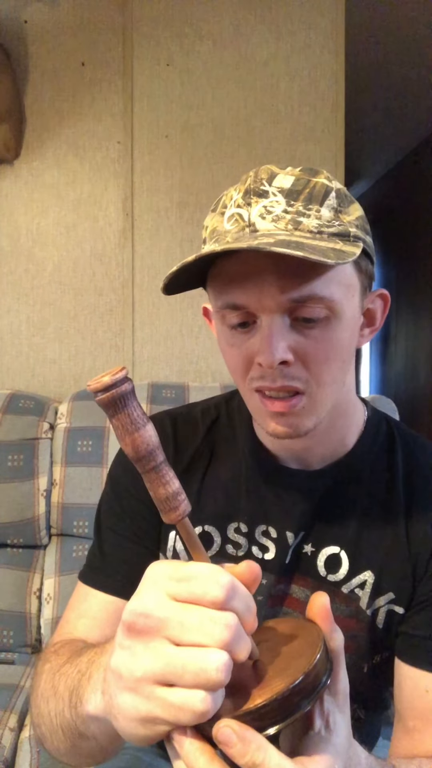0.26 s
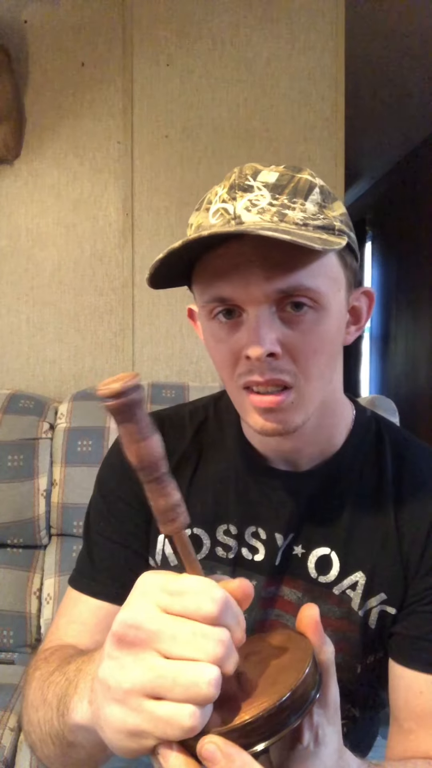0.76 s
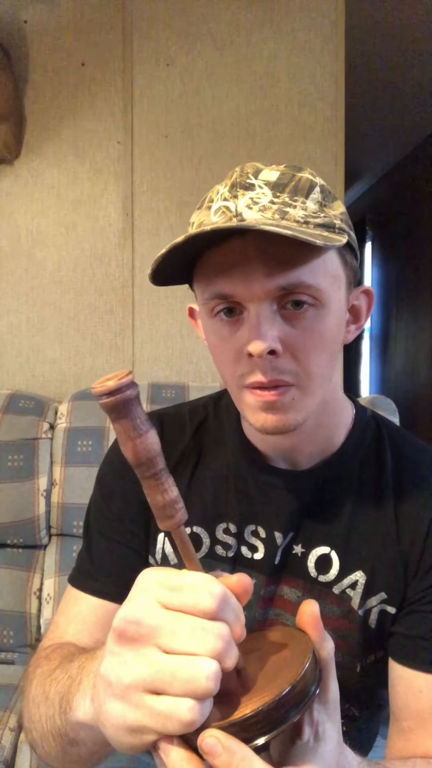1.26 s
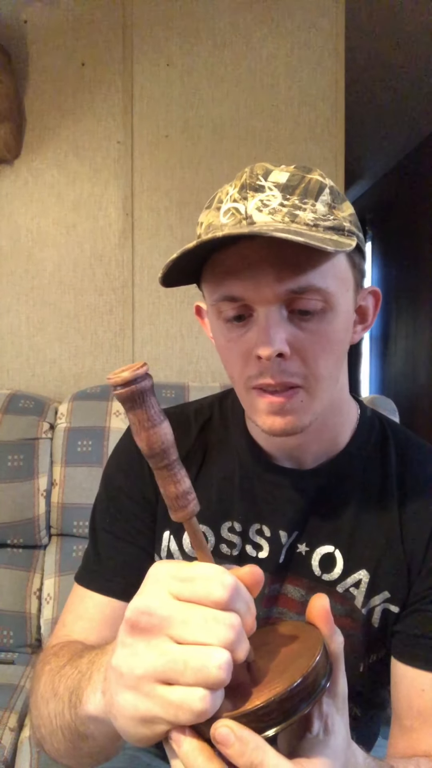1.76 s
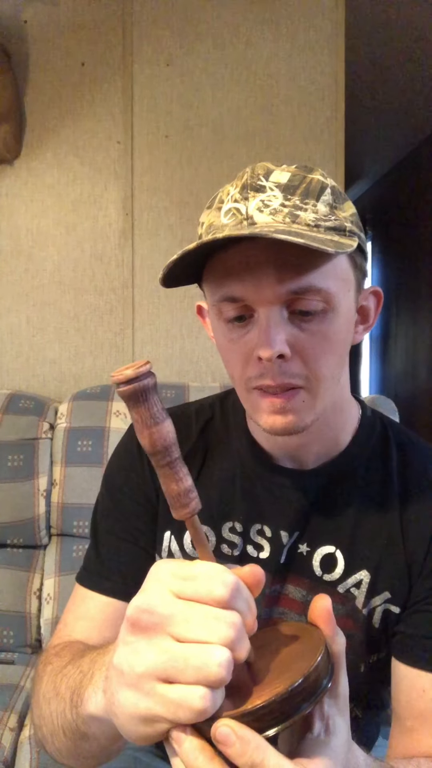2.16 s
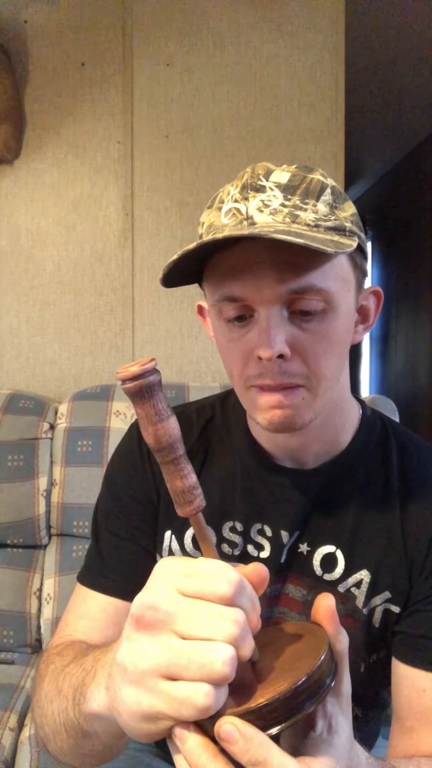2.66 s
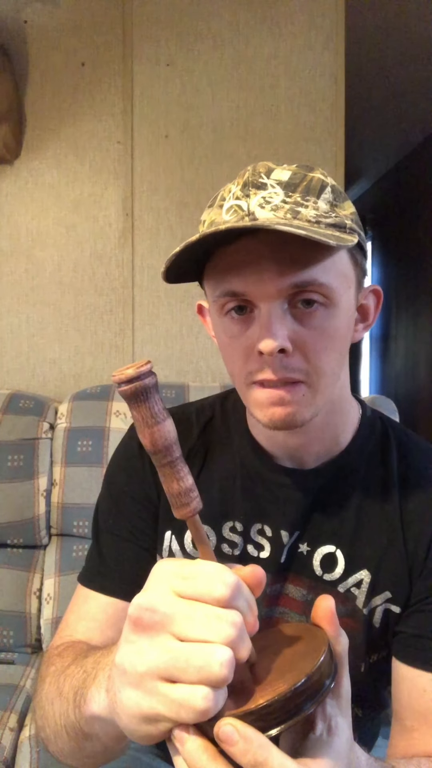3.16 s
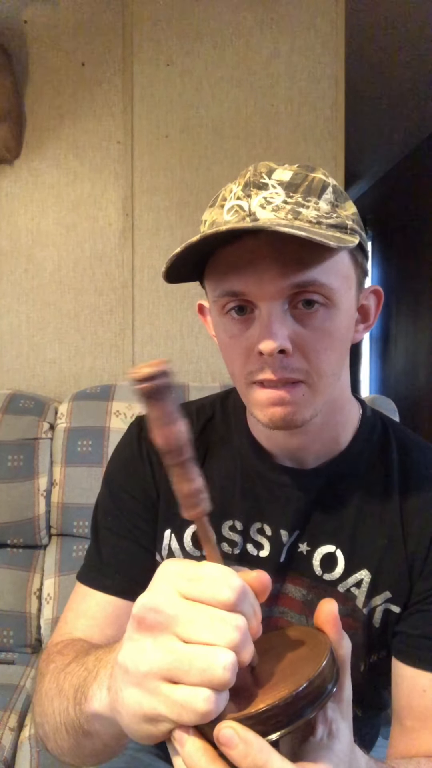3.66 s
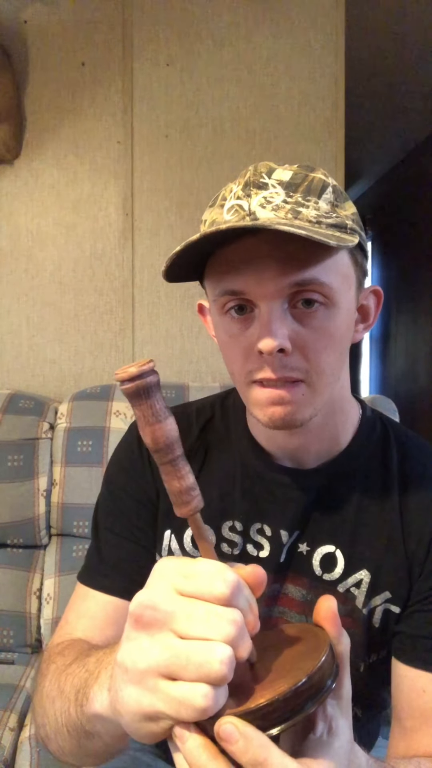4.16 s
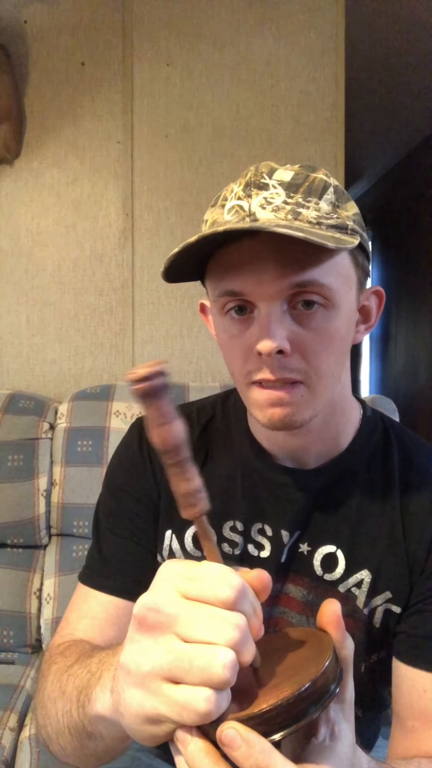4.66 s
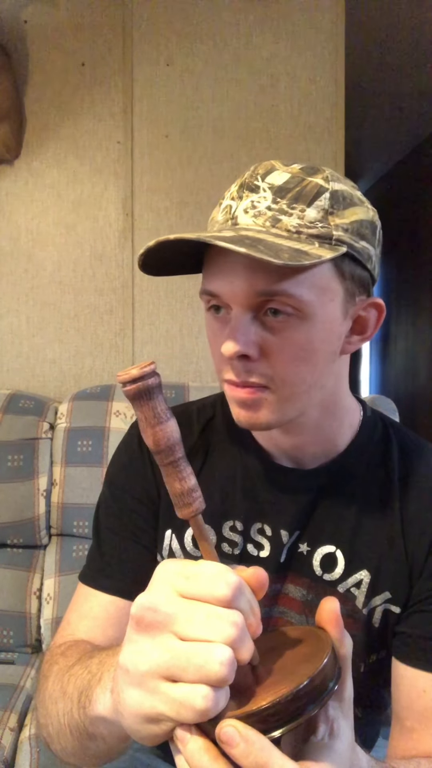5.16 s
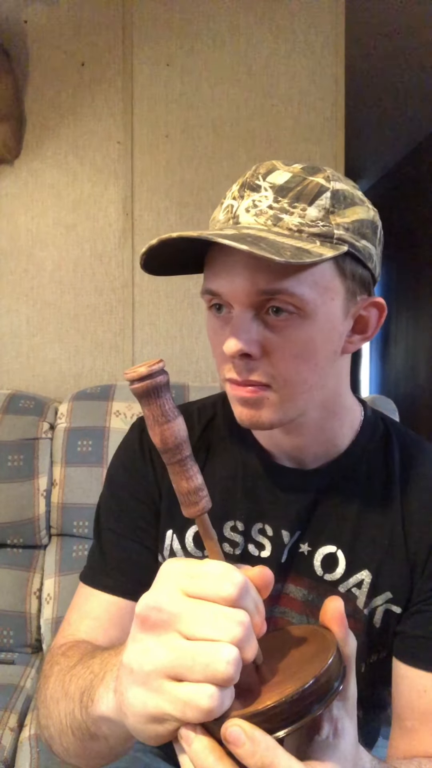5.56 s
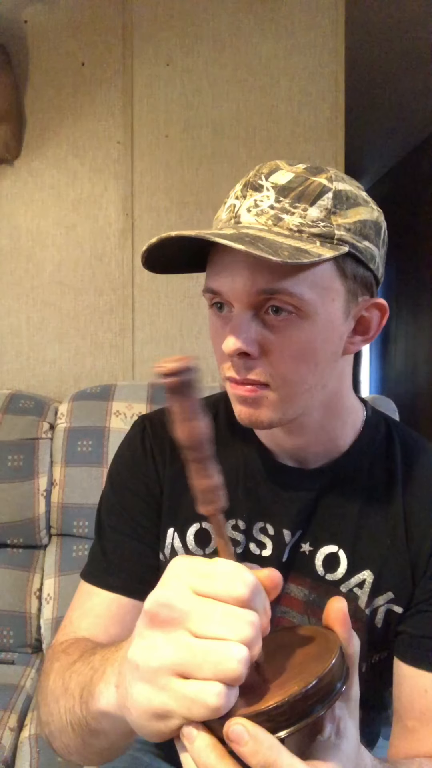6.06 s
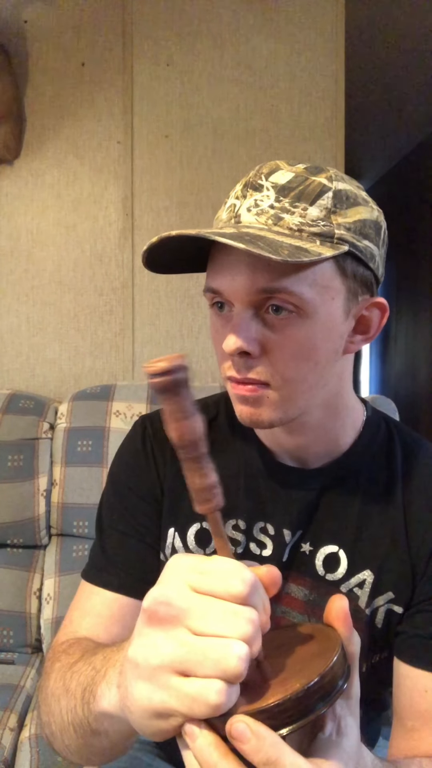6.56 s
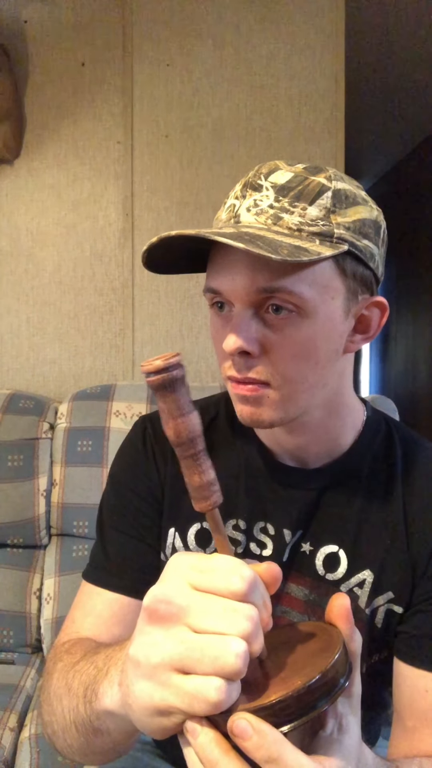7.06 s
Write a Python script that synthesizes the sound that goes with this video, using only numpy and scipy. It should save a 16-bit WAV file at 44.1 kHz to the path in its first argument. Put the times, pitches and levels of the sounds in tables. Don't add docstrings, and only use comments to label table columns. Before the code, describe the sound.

Close indoor capture of a handheld friction game call: brief, nasal, hollow scratches like a hen turkey's yelps. Gentle strokes rasp straight away, while harder ones open with a tiny high squeak that drops and breaks into a rough buzz. Two runs of separate notes are divided by a short gap, each note ringing briefly off the walls over quiet hiss and mains hum.

```python
import sys
import numpy as np
from scipy import signal
from scipy.fft import rfft, irfft
from scipy.io import wavfile
from scipy.ndimage import uniform_filter1d, minimum_filter1d

SR = 44100
rng = np.random.default_rng(int(sys.argv[2]) if len(sys.argv) > 2 else 0)


def convert_level_to_amplitude(level_db):
    exponent = np.asarray(level_db, float) / 20
    return 10 ** exponent


def to_wav(sig):
    pcm = np.clip(np.atleast_2d(sig), -1, 1) * 32767
    pcm = np.round(pcm).astype(np.int16)
    wavfile.write(sys.argv[1], SR, pcm.T)


N = 321922

SAG_POWER = 4.2


def evened(x):
    return x / np.sqrt(np.mean(x ** 2) + 1e-20)


def read(points, hz, order=1):
    columns = np.transpose(points)
    return np.interp(np.log(hz + 1), np.log(columns[0] + 1), columns[order])


def wander(count, size):
    smooth = uniform_filter1d(rng.standard_normal(count), size)
    return evened(uniform_filter1d(smooth, size))


def add(mix, s, sound):
    part = mix[round(s * SR):][:len(sound)]
    part += sound[:len(part)]


def floor():
    # f/Hz, level/dB per Hz
    hiss_spectrum = [(20, -30), (45, -6), (100, -8.5), (400, -10.5), (700, -16), (1500, -23), (3000, -25.5),
                     (5500, -30), (8000, -31), (10000, -24.5), (13000, -34.5), (15000, -32), (16000, -33.5)]
    # f/Hz, rms level/dB
    hum_lines = [
        (60, -61.5),
        (120, -73),
        (180, -78.5),
        (240, -77),
    ]
    hiss_db = -67.5
    hz, t = np.fft.rfftfreq(N, 1 / SR), np.arange(N) / SR
    white = rfft(rng.standard_normal(N))
    hiss = evened(irfft(white * convert_level_to_amplitude(read(hiss_spectrum, hz)), N))
    waver = convert_level_to_amplitude(1.1 * wander(N, size=9000))
    hum = sum(convert_level_to_amplitude(db - 1.5) * np.sin(2 * np.pi * (f * t + rng.random())) for f, db in hum_lines)
    return convert_level_to_amplitude(hiss_db) * hiss + waver * hum


def tap(db):
    # f/Hz, bandwidth/Hz, level/dB
    knock_modes = [
        (1220, 110, 1),
        (1971, 270, -5),
    ]
    t = np.arange(2000) / SR
    modes = sum(convert_level_to_amplitude(d) * np.exp(-np.pi * w * t) * np.sin(2 * np.pi * hz * t) for hz, w, d in knock_modes)
    contact = np.minimum(t / 0.0022, 1) ** 2
    return convert_level_to_amplitude(db + 6.5) * modes * contact


def drag(t, length, db, squeak_s, low_hz, end_hz):
    squeak_hz, sharp_hz, settle_s = 1602, 224.4, 0.0027
    break_s, squeak_end_hz, climb_power = .0013, 1750, 2.8
    droop_hz, droop_s, break_dip_db = 53, .016, -0.5
    squeak_db, bite_db, bite_s, sag_db = 9, 4.5, .005, -3
    t = np.clip(t, 0, length)
    squeak = 1 / (1 + np.exp((t - squeak_s) / break_s))
    broken_s = np.clip(squeak_s, 0, length / 2)
    climb = np.clip((t - broken_s) / (length - broken_s), 0, 1) ** climb_power
    high = squeak_hz + sharp_hz * np.exp(-t / settle_s) + (squeak_end_hz - squeak_hz) * climb
    low = low_hz + (end_hz - low_hz) * climb + droop_hz * np.exp(-t / droop_s)
    bite = bite_db * np.exp(-t / bite_s) * (1 - squeak)
    falter = break_dip_db * 4 * squeak * (1 - squeak)
    sag = sag_db * (t / length) ** SAG_POWER
    return low + squeak * (high - low), db + squeak_db * squeak + bite + falter + sag


def stroke(start, length, db, squeak_s, low_hz, end_hz, creep_s=.03):
    break_hz, break_width_hz = 1410, 110
    dull_db = -4
    hard_jitter, gentle_jitter, hard_grit_db = .019, .006, 4
    end = start + length
    t = np.arange(start - creep_s, end + .02, 1 / SR)
    drift = wander(count=7000, size=30)[:len(t)]
    grit, creep = rng.standard_normal((2, SR // 5))[:, :len(t)]
    before, after = np.maximum(start - t, 0), np.maximum(t - end, 0)

    hz, pressure_db = drag(t - start, length, db, squeak_s, low_hz, end_hz)
    hz = hz + 14000 * np.minimum(before, .008)
    below = 1 / (1 + np.exp((hz - break_hz) / break_width_hz * 4))
    rasp = np.maximum.accumulate(below)
    slope = np.gradient(uniform_filter1d(hz, size=120)) * SR
    falling = np.clip(-slope / 50000, 0, 1) * (before == 0)
    chaos = uniform_filter1d(4 * rasp * (1 - rasp), size=260)
    jitter, gritty_db = (hard_jitter, hard_grit_db) if squeak_s > 0 else (gentle_jitter, 0)
    unsteady = (0.00089 + jitter * rasp + 0.04 * chaos) * drift
    turns = np.cumsum(hz * (1 + unsteady)) / SR / 2
    swell_db = -(5600 + 900 * rasp) * before - (350000 + 550000 * rasp) * after ** 2
    swell_db = uniform_filter1d(swell_db, size=170)

    k = np.arange(1, 36)[:, None]
    share = np.where(k % 2, 1.214 * rasp, 1) * (k * hz < SR * .75)
    late_db = -3000 * np.maximum(start + 0.0028 * (1 - rasp) - t, 0)
    sharp_db = 0.61 * (db + 23.5)
    octaves = np.log2(np.maximum(k * hz / 2 / 1800, 1))
    run_out = np.clip((t - start) / length, 0, 1) ** SAG_POWER
    tilt_db = sharp_db - 1.3 * (1 - rasp) + dull_db * run_out
    overtones_db = (late_db - 1.0 * (1 - rasp) - 6 * falling) * (k > 3) + tilt_db * octaves
    uneven = np.array([wander(count=7000, size=200)[:len(t)] for _ in k])
    overtones_db = overtones_db + (2.5 + sharp_db / 4) * uneven * np.minimum(octaves, 1)
    slips = (share * convert_level_to_amplitude(overtones_db) * np.cos(2 * np.pi * k * turns)).sum(0)

    grit = grit * (0.21 + np.exp(-((2 * turns) % 1) / .3))
    fine = signal.sosfilt(signal.butter(8, 2150, "high", fs=SR, output="sos"), grit)
    grit = fine + 0.2 * rasp * (grit - fine)
    puffs = grit * convert_level_to_amplitude(late_db + 0.5 * sharp_db + gritty_db * rasp)
    scratch = convert_level_to_amplitude(-6.0 + 0.93 * rasp + 16.8 * falling) * convert_level_to_amplitude(15 * chaos) * puffs
    creep = signal.sosfilt(signal.butter(2, 1500, "high", fs=SR, output="sos"), creep)
    creep_fade = (t < start) * np.minimum((t - t[0]) / .01, 1)
    rubbing = convert_level_to_amplitude(-37 - 450 * before) * creep * creep_fade
    return t[0], convert_level_to_amplitude(pressure_db + swell_db) * (slips + scratch) + rubbing


def ring_of_pot():
    # f/Hz, level/dB
    body = [(300, -103.5), (520, -46.5), (620, -29), (950, -9), (1500, -7.5), (2000, -8.5), (2300, -14),
            (3700, -30), (5000, -29), (7000, -46.5), (10000, -51), (13400, -60), (16000, -72)]
    # f/Hz, bandwidth/Hz, level above/dB
    pot_modes = [(1206, 369, 14), (1870, 595, 5), (2671, 190, 11.5), (2956, 145, -7), (4574, 450, 12.5),
                 (5454, 220, 7), (6026, 88, 7.5), (8320, 320, 6.5), (11650, 910, 13), (13500, 350, -21),
                 (14400, 670, 11)]
    hz = abs(np.fft.fftfreq(8192, 1 / SR))
    peaks_db = sum(d / (1 + (2 * (hz - f) / w) ** 2) for f, w, d in pot_modes)
    log_gain = np.log(convert_level_to_amplitude(read(body, hz) + peaks_db))
    phase = -signal.hilbert(log_gain).imag
    return np.fft.ifft(np.exp(log_gain + 1j * phase)).real[:2048]


def room(x):
    # f/Hz, t60/s, reverberation level/dB
    walls = [(500.4, .3, -1.5), (1245, 0.44, -6), (1570, 0.4, -5), (2560, 0.4, -8), (4800, 0.36, -15.5),
             (8900, 0.26, -6), (13700, 0.12, -28)]
    taps = np.zeros(SR * 2 // 3)
    at = np.arange(260, len(taps) - 20, 16)
    taps[at + rng.integers(0, 16, len(at))] = rng.choice([-1., 1.], len(at))
    hz, t, z = signal.stft(taps, SR, nperseg=128)
    t60 = np.maximum(read(walls, hz), .05)[:, None]
    near_walls = 1 - np.exp(-(t / 0.0093) ** 2)
    decay = convert_level_to_amplitude(read(walls, hz, order=2)[:, None] - 60 * t / t60)
    fall = decay / np.sqrt(t60 * SR / 16 / np.log(1e6))
    response = signal.istft(z * fall * near_walls, SR, nperseg=128)[1]
    return signal.fftconvolve(x, response)[:N]


def scene():
    # t/s, peak level/dB
    set_downs = [
        (0.321, -39.5),
        (3.223, -40.5),
        (4.593, -35),
    ]
    # start t/s, length/s, pressure level/dB, lowest slip rate f/Hz, last slip rate f/Hz
    gentle = [
        (0.395, 0.053, -22.5, 1166, 1231),
        (0.73, 0.042, -20, 1150, 1347),
        (3.488, 0.03, -22, 1162, 1363),
        (4.489, 0.033, -26.5, 1145, 1225),
        (4.656, 0.052, -20, 1157, 1130),
        (5.677, 0.056, -20, 1091, 1240),
    ]
    # start t/s, length/s, pressure level/dB, squeak duration/s, lowest slip rate f/Hz
    hard = [(1.072, 0.061, -18.5, .003, 1163), (1.464, .050, -17, 0.0081, 1161),
            (1.875, .044, -16.5, 0.004, 1166), (2.294, 0.038, -15, .0095, 1169),
            (2.724, 0.042, -14.5, 0.011, 1184), (3.656, 0.035, -17, 0.0092, 1261),
            (3.943, .029, -13.5, .06, 1200), (4.929, 0.035, -17, 0.013, 1154),
            (5.229, .046, -17, .007, 1129), (6.034, 0.047, -15, .0165, 1173),
            (6.447, 0.055, -17, .0085, 1117), (6.847, .044, -17, .001, 1089),
            (7.245, 0.037, -15, 0.0074, 1147)]
    gentle_squeak_s, hard_end_hz = -0.0012, 1373
    strokes = [(s, length, db, gentle_squeak_s, low, end) for s, length, db, low, end in gentle]
    strokes += [(*row, hard_end_hz) for row in hard]
    force = np.zeros(N)
    for row in sorted(strokes):
        add(force, *stroke(*row))
    call = signal.oaconvolve(force, ring_of_pot())[:N]
    for s, db in set_downs:
        add(call, s, tap(db))
    return (call + room(call) + floor())[None]


def roll_off(x):
    return signal.sosfilt(signal.butter(12, 16430, fs=SR, output="sos"), x)


def record(dry):
    power_db = 10 * np.log10(uniform_filter1d(dry ** 2, size=60) + 1e-12)
    over_db = -minimum_filter1d(-np.maximum(power_db + 9.5, 0), size=150)
    held = dry * convert_level_to_amplitude(-.6 * uniform_filter1d(over_db, size=150))
    bent = 1.01 * np.tanh(held / 1.121) + .003 * held ** 2
    faded = bent * np.minimum(np.arange(N)[::-1] / 500, 1)
    band_limit = signal.firwin(511, 15900, window=("kaiser", 9), fs=SR)[None]
    limited = signal.oaconvolve(faded, band_limit, "same")
    return roll_off(limited)


dry = scene()
out = record(dry)
to_wav(out)
```